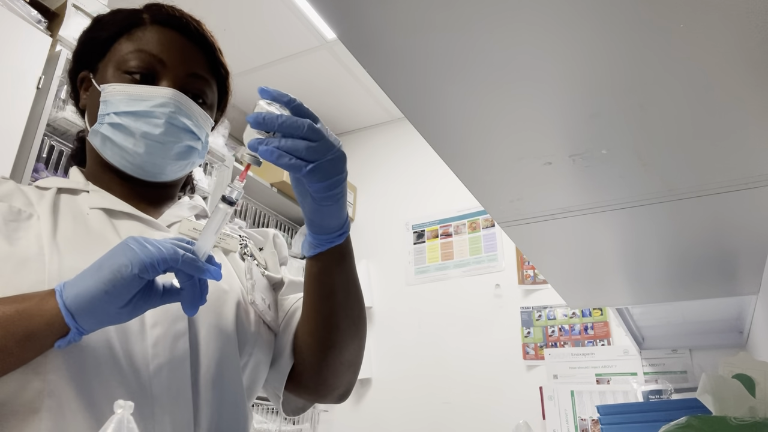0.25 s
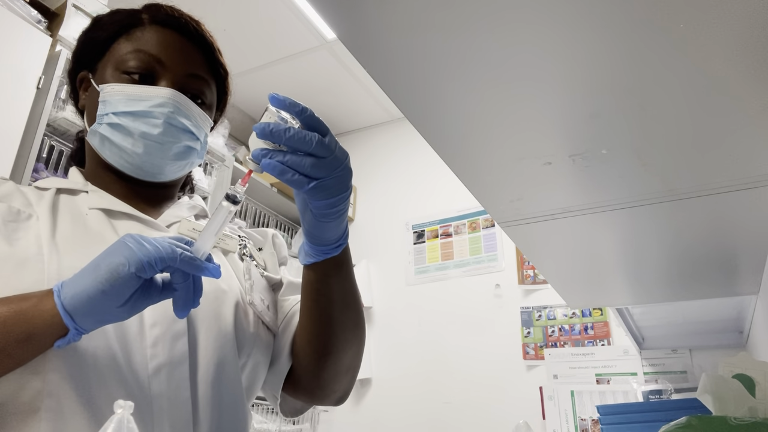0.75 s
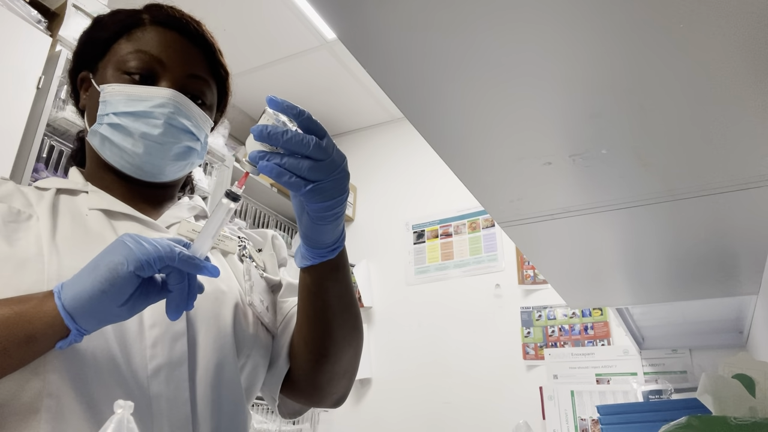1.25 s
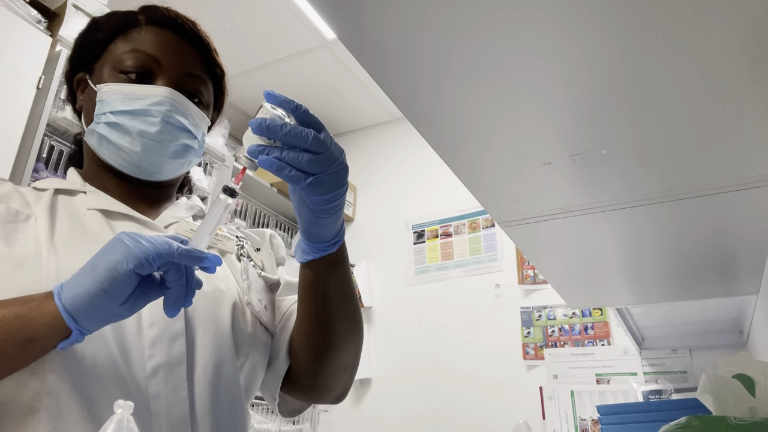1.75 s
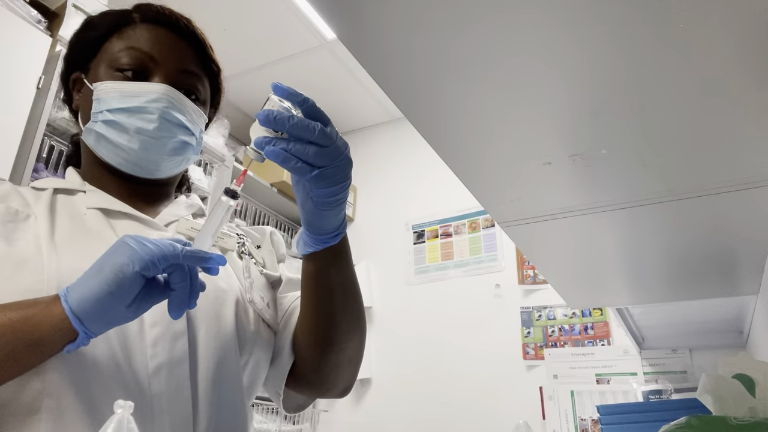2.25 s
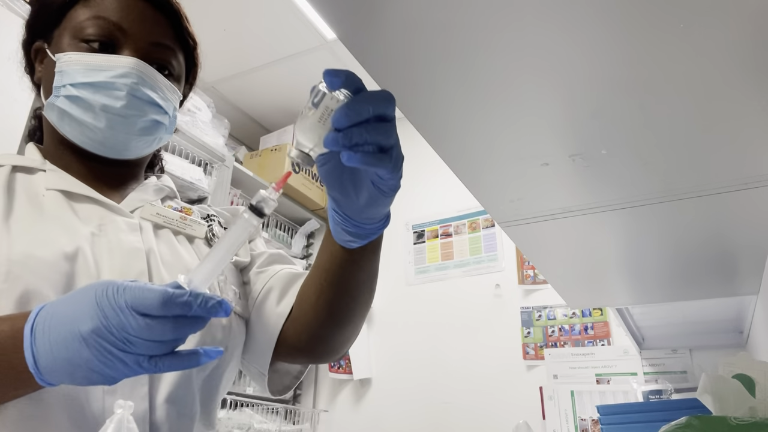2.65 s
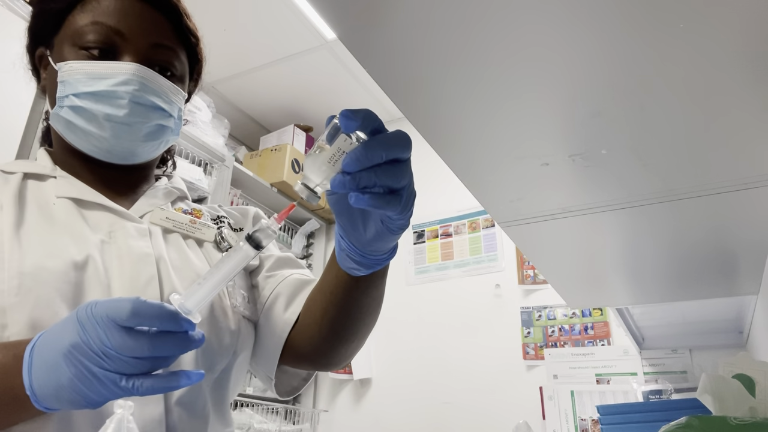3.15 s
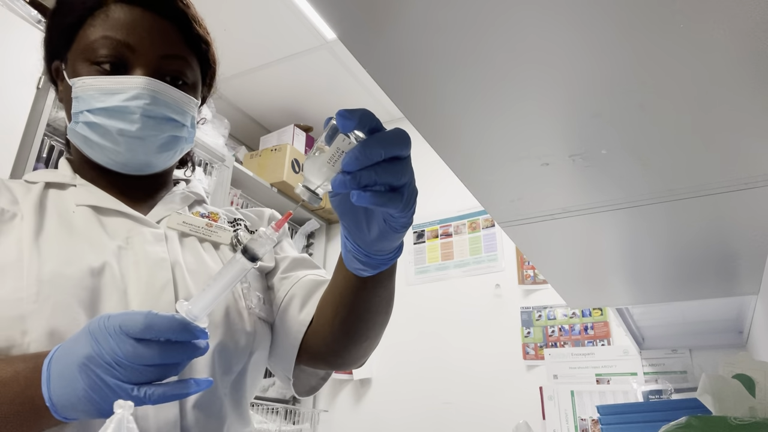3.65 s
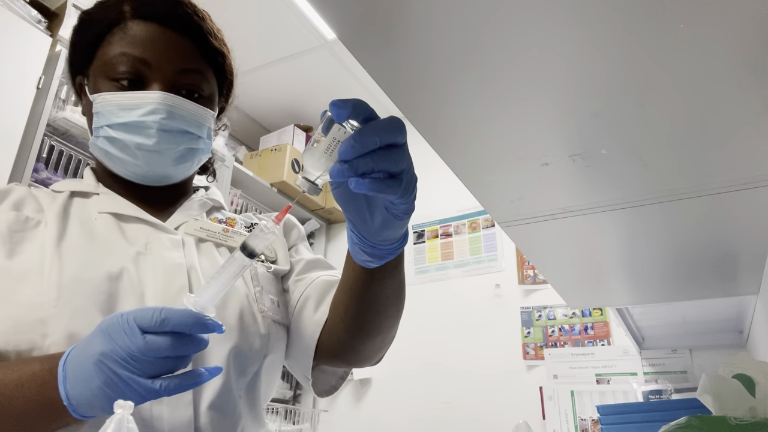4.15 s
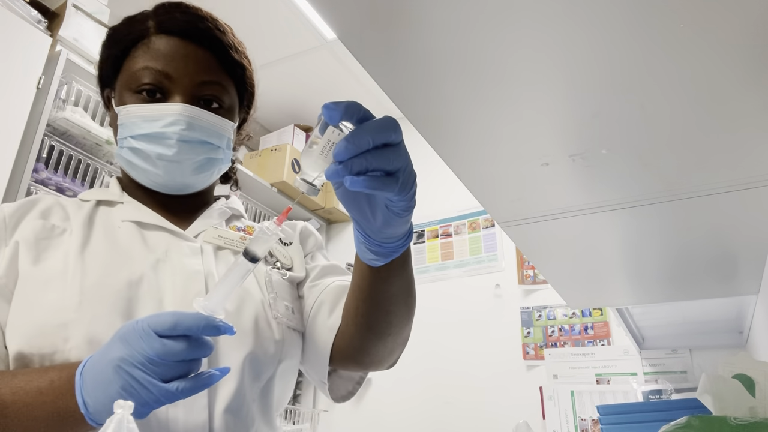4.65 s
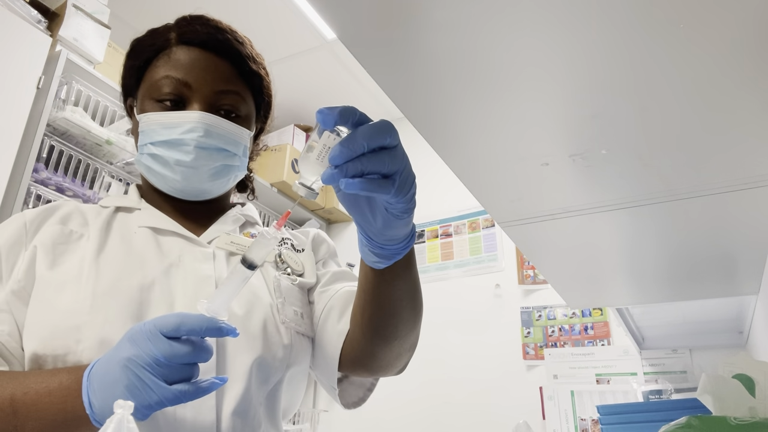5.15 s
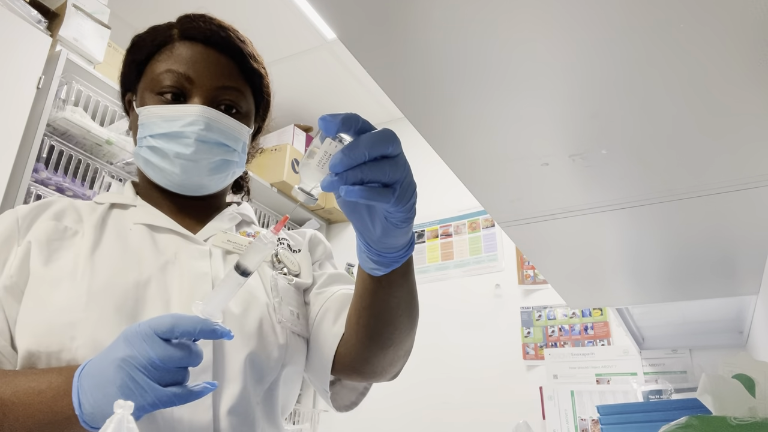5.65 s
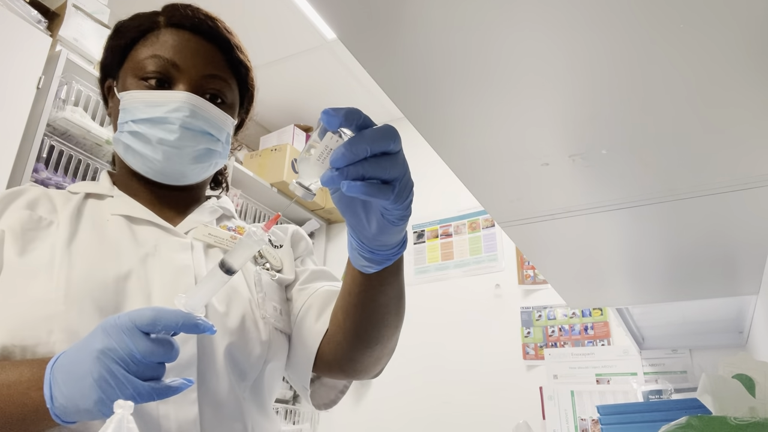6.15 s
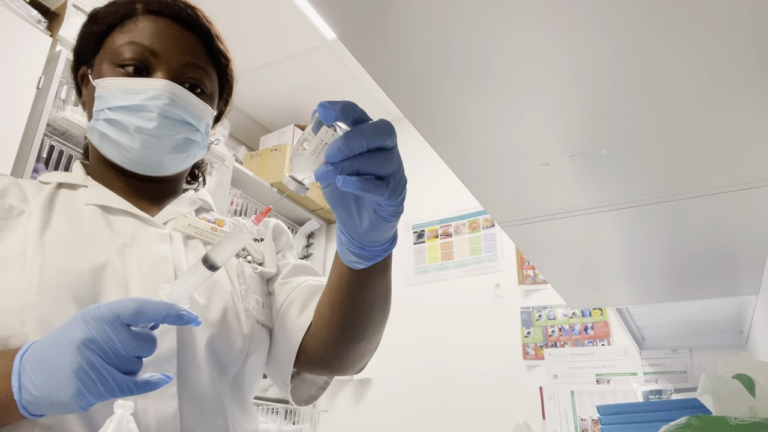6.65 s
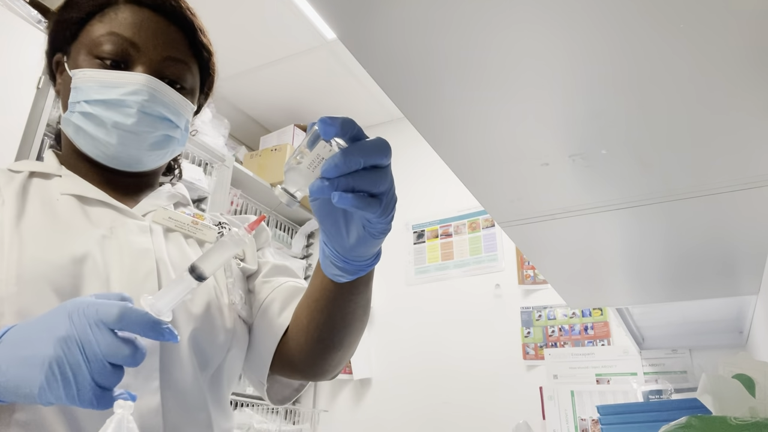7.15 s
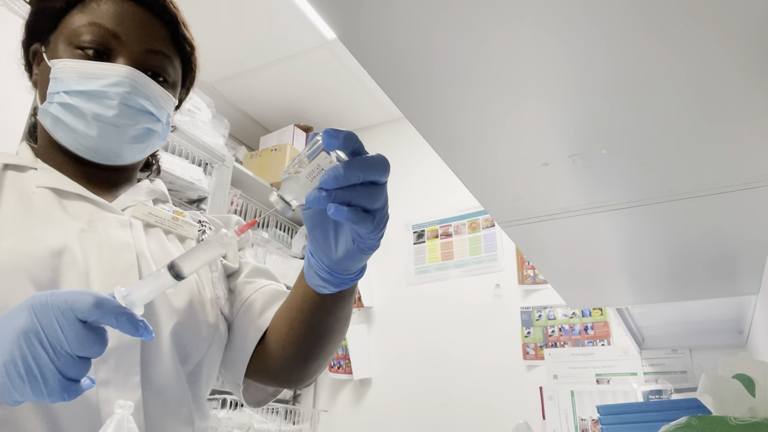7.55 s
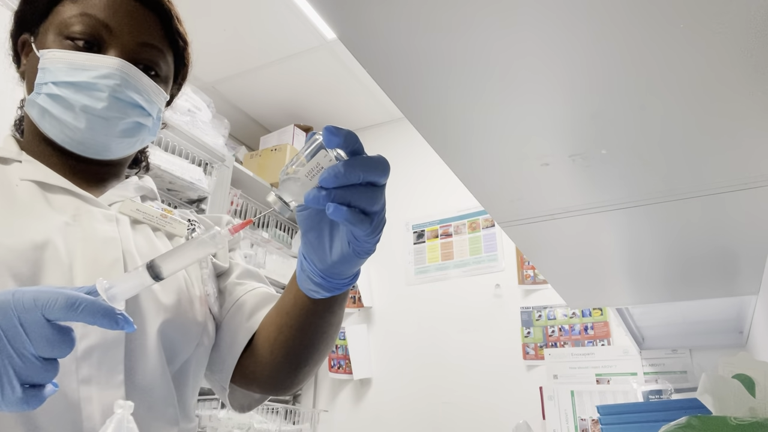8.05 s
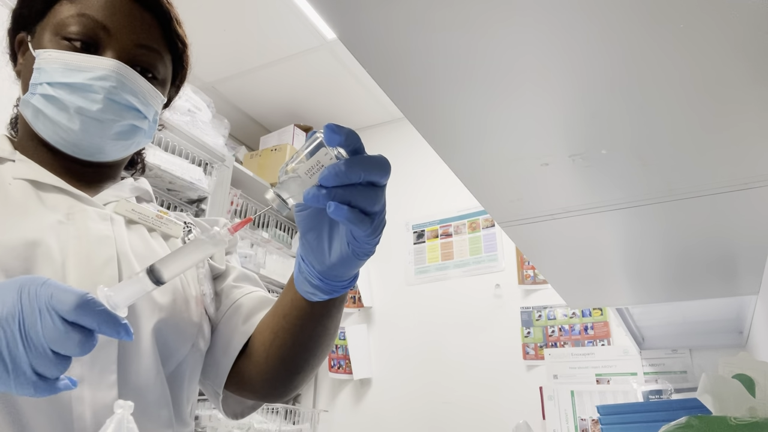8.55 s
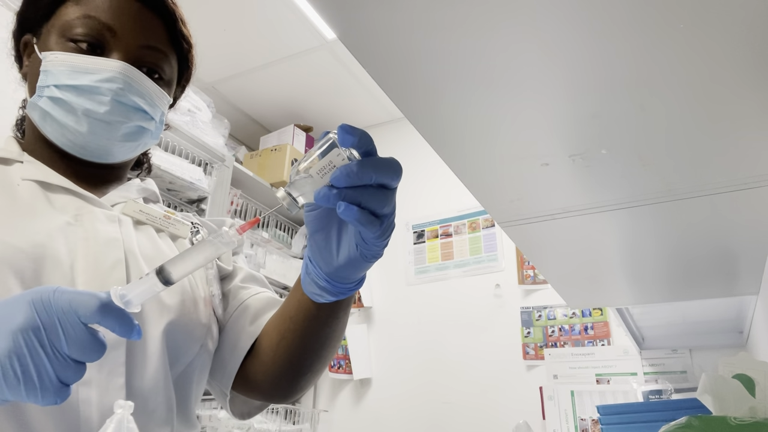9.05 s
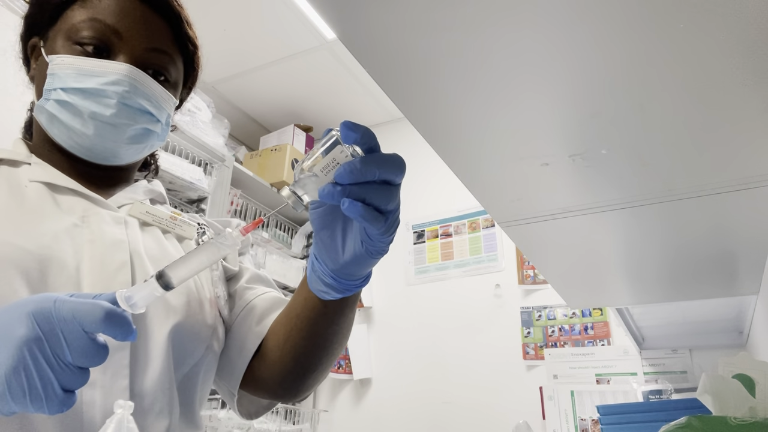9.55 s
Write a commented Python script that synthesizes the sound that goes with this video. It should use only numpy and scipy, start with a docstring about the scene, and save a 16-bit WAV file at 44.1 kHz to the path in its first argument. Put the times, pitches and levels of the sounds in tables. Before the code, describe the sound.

Throughout about ten seconds, an air-conditioning unit hums loudly in a small hospital room: a strong steady drone near 200 Hz with a weaker 100 Hz below it, low rushing air, faint fan tones and a thin, slightly wandering whistle near 1.4 kHz. Close to the stereo microphone, gloved hands work a syringe in a vial, far quieter than the hum. A faint scuff and tiny squeaks come at 1.2 s. At 2.4 s everything dips to silence for a few hundredths of a second. A dull plastic click follows at 2.9 s and a crisper, brighter one at 3.1 s. From 3.3 to 6.4 s there are sparse soft rubs, small knocks and high rubber squeaks. Rustling grows at 6.7 s and 7.7 to 8.5 s, then quiets. A small tick, scuff and cluster of squeaks come at 9.6 s. The room tail is short and dry.

```python
"""An air-conditioning unit hums in a small hospital room: a strong mains drone, faint fan-shaft tones,
steady whines, a thin air whistle and rushing air, made of sines, a modulated carrier and coloured noise.
Close by, gloved hands work a plastic syringe in a vial: two clicks (ringing modes and noise cracks),
small scuffs, knocks and a soft rustle (grainy noise), tiny squeaks (short rough tones), with a room tail."""
import sys
import numpy as np
from scipy import signal
from scipy.fft import rfft, irfft, next_fast_len
from scipy.io import wavfile
from scipy.ndimage import map_coordinates

SR = 44100
rng = np.random.default_rng(int(sys.argv[2]) if len(sys.argv) > 2 else 0)


def wrap_up_sound(samples):
    """Save the sound to the file named by the first command line argument, as 16-bit audio."""
    columns = np.atleast_2d(samples).T
    # keep every value between -1 and 1, then stretch to whole-number steps
    tamed = np.clip(columns, -1, 1)
    steps = np.round(tamed * 32767).astype(np.int16)
    wavfile.write(sys.argv[1], SR, steps)


N = 432621

# sound field at the two microphones: hz, coherence (0-1), left_lead_rad, left_minus_right_db
PORTS = [(45, .99, 0, -.8), (130, .99, .2, -4.4), (250, .93, .6, -3.8), (350, .55, 1, -5.6),
         (500, .38, 1.9, -3.2), (720, .55, 2.5, .4), (1000, .28, 2.1, 1.5), (1400, .4, 2.7, -.4),
         (2200, .14, 0, 3.5), (3200, .15, .3, 0), (5600, .1, -1, -1.8), (8000, .8, .5, -.3),
         (11050, .92, 3.1, 0), (13100, .7, 4.8, -.5), (15000, .9, 6.5, 0)]
HALF = np.array([[.5], [-.5]])  # splits a left-right difference evenly


def amp(db):
    """Decibels to gain."""
    return 10 ** (np.asarray(db) / 20)


def unit(x):
    """Scale to rms 1."""
    return x / np.sqrt(np.mean(x ** 2) + 1e-20)


def along(points, hz, axis=1):
    """One column of a table read on a log-frequency axis."""
    table = np.transpose(points)
    return np.interp(np.log(hz + 1), np.log(table[0] + 1), table[axis])


def left_lead_rad(hz):
    """Phase lead of the left microphone."""
    return along(PORTS, hz, axis=2)


def clock():
    """Time of each sample in seconds."""
    return np.arange(N) / SR


def curve(rows):
    """(s, value) rows joined by straight lines."""
    return np.interp(clock(), *np.transpose(rows))


def wobble(rate_hz):
    """A random curve with rate_hz knots a second."""
    coarse = np.arange(0, N + 64, 64)
    knots = rng.standard_normal(4096)
    values = map_coordinates(knots, [coarse * rate_hz / SR], mode="wrap")
    return np.interp(np.arange(N), coarse, values)


def complex_wobbles(rate_hz):
    """One complex random curve for each channel."""
    return np.array([wobble(rate_hz) + 1j * wobble(rate_hz) for _ in range(2)])


def filtered(x, response):
    """x times a response of frequency."""
    m = next_fast_len(N + SR // 2)
    return irfft(rfft(x, m) * response(np.fft.rfftfreq(m, 1 / SR)), m)[..., :N]


def at_ports(pair, colour_db):
    """Two unrelated noises become one coloured sound field of rms 1 at two microphones."""
    def mix(hz):
        turn = np.arccos(np.clip(along(PORTS, hz), 0, 1)) / 2  # sets the coherence
        return amp(colour_db(hz)) * [np.cos(turn), np.sin(turn)]

    def place(hz):
        balance = amp(HALF * along(PORTS, hz, axis=3))
        return balance * np.exp(1j * HALF * left_lead_rad(hz))

    mid, side = filtered(pair, mix)
    return unit(filtered(np.array([mid + side, mid - side]), place))


def tone(cycles, left_db, right_db, lead_rad):
    """A sine with its own level and phase at each microphone."""
    phase = 2 * np.pi * (cycles + rng.random())
    left = amp(left_db) * np.sin(phase + lead_rad)
    right = amp(right_db) * np.sin(phase)
    return np.sqrt(2) * np.array([left, right])


def motor(mains_hz=49.947, lead_rad=0.1, waver_db=0.14):
    """Magnetic forces shake the casing at even multiples of the mains."""
    # magnetic hum: mains_multiple, left_db, right_db
    harmonics = [(2, -37, -34.5), (4, -24.0, -18.5), (8, -68, -57), (12, -60.5, -58)]
    cycles = mains_hz * clock()
    hum = sum(tone(k * cycles, left, right, lead_rad * k) for k, left, right in harmonics)
    return hum * amp(waver_db * wobble(4.0))


def fan(shaft_hz=48.668, drift=.0001):
    """The shaft runs a little slower than the mains; its tones and the whines drift together in pitch."""
    # fan tones: shaft_multiple, left_db, right_db
    shaft_tones = [(14, -65, -65), (18, -66, -64.5), (20, -61.5, -67), (22, -71.5, -61), (24, -68, -70.5),
                   (26, -73, -73), (32, -73, -69.5), (57, -80, -78), (58, -73, -66), (59, -79, -75),
                   (60, -77, -72), (61, -66.5, -72), (62, -78, -84.5), (64, -79, -80.5), (65, -79, -79),
                   (66, -81, -83), (67, -77.5, -77), (75, -85, -80.5), (77, -81.5, -82.5), (119, -91, -86),
                   (158, -87.5, -89)]
    # other steady tones of the unit: pitch_hz, left_db, right_db
    whines = [(460, -55.0, -57.0), (11800, -82, -80), (12200, -88, -86)]
    seconds = np.cumsum(1 + drift * wobble(2)) / SR
    lines = [(k * shaft_hz, left, right) for k, left, right in shaft_tones] + list(whines)
    return sum(tone(hz * seconds, left, right, left_lead_rad(hz)) for hz, left, right in lines)


def whistle(pitch_hz=1364.7, wander_hz=1.3, lead_rad=-1.2, rough=0.23, breathy=.42):
    """A narrow air whistle that wanders in pitch, over a weaker skirt of turbulence."""
    # steady part of the whistle: time_s, level_db
    level_points = [(0, -55.5), (2.3, -55), (2.5, -61), (4, -58), (5.5, -56.5), (7.5, -59.5), (9.8, -64.5)]
    cycles = np.cumsum(pitch_hz + wander_hz * wobble(5)) / SR
    flutter = 1 + rough * complex_wobbles(16)
    skirt = breathy * complex_wobbles(90)
    carrier = np.exp(1j * (2 * np.pi * cycles + np.array([[lead_rad], [0]])))
    return amp(curve(level_points)) * np.sqrt(2) * ((flutter + skirt) * carrier).real


def airflow(air_db=-31.0, swell_db=0.93):
    """Turbulent air, coloured by the resonances of duct and room."""
    # spectrum of rushing air: hz, relative_density_db
    spectrum = [(27, -30.5), (44, -12.5), (65, -7), (85, -12.5), (130, -6), (240, -5.5), (340, -10.5),
                (430, -20), (620, -19.5), (900, -27), (1500, -29.5), (2100, -36.5), (3300, -40.5),
                (4500, -45.5), (6500, -51.5), (8700, -53), (10500, -62), (13000, -65.5), (15500, -68.5)]
    # resonances and hollows of duct and room: centre_hz, width_hz, gain_db
    resonances = [(46.6, 7.8, 5.5), (131.6, 14, 4), (149, 12, 2.5), (161.4, 12, -7.5), (182.5, 14, 7.5),
                  (329, 16, 1.5), (382, 36, -1.5), (430, 14, -1), (489.3, 33, 7.5), (530.5, 21, 6),
                  (590, 36, 0.5), (710, 18, -3), (759, 45, 6), (806, 33, -1.5), (926, 25, -4.5),
                  (956, 48, 5.5), (1065, 60, 5.5), (1210, 30, 6), (1320, 51, -4), (1460, 32, 4),
                  (2780, 50, 4), (3160, 120, -1.5)]

    def colour_db(hz):
        bumps = sum(db / (1 + (2 * (hz - centre) / width) ** 2) for centre, width, db in resonances)
        return along(spectrum, hz) + bumps

    return at_ports(rng.standard_normal((2, N)), colour_db) * amp(air_db + swell_db * wobble(6.5))


def syringe(crack_db=-5.0, crack_t60_s=0.014, ring_db=-6, scatter_db=2.2, right_db=1):
    """Each click is a contact and its rebound; both crack and ring barrel modes of alternating sign."""
    # clicks: contact_s, contact_db (before the lowpass), lowpass_hz, rebound_over_contact_db
    clicks = [(2.8823, -28.5, 1140, 4.5), (3.0907, -25.5, 12000, -5)]
    # ring of the plastic barrel: mode_hz, relative_db, t60_s
    modes = [(1070, -5, .015), (1620, 0.5, 0.017), (2040, -5, 0.01), (2600, -5.5, 0.01), (3180, -3.5, .008),
             (3550, -1, .012), (4900, -7, .008), (5950, -11, 0.011), (7160, -1.5, 0.011), (8380, -2, .011),
             (9300, 0.5, .009), (10700, -6, .007), (12100, -7, .007), (13900, -5, .009)]
    rebound_s = .00187  # from the first contact to the second
    shadow_hz = 4000  # above this the ring reaches the two microphones out of step
    out, t = np.zeros((2, N)), np.arange(SR // 10) / SR
    for s, db, dull_hz, rebound_db in clicks:
        pole = np.exp(-2 * np.pi * dull_hz / SR)
        for start_s, level_db in ((s, db), (s + rebound_s, db + rebound_db)):
            ring = 0
            for k, (hz, mode_db, t60_s) in enumerate(modes):
                decay = amp(mode_db + rng.normal(0, scatter_db, (2, 1)) - 60 * t / t60_s)
                offset_rad = HALF * left_lead_rad(hz) * (hz > shadow_hz)
                ring = ring + (-1) ** k * decay * np.sin(2 * np.pi * hz * t + offset_rad)
            crack = amp(crack_db - 60 * t / crack_t60_s) * rng.standard_normal((2, len(t)))
            hit = signal.lfilter([1 - pole], [1, -pole], amp(ring_db) * ring + crack)
            out[:, round(start_s * SR):][:, :len(t)] += amp(level_db - HALF * right_db) * hit
    return out


def gloves(pitch_q=3.3, grain_db=3.5, uneven_db=2.0):
    """Grainy low rustle; short scuffs and knocks, each with a pitched part, from faint to dominant."""
    # scuffs and small knocks of glove, barrel and vial:
    # start_s, noise_db, length_s (twice the rise), pitch_hz, pitched_db
    contacts = [(1.233, -63, 0.0074, 8300, -65), (2.587, -62, .015, 5550, -62),
                (2.879, -55, 0.0064, 2000, -49), (3.585, -57, 0.014, 5600, -65),
                (4.590, -58, .006, 13700, -67), (4.759, -55, 0.024, 5940, -54),
                (4.945, -68, .012, 13500, -69), (5.169, -63, 0.012, 2550, -50.5),
                (5.588, -61, .018, 1900, -55), (5.821, -68, .02, 5200, -63), (6.185, -75, .04, 3500, -60),
                (6.59, -65, .016, 13700, -72), (6.912, -61, 0.026, 8000, -67),
                (7.143, -61, .014, 4800, -63), (7.585, -65, 0.023, 2500, -56),
                (9.596, -61, 0.011, 2720, -51.5)]
    # colour of rubbing rubber: hz, relative_density_db
    spectrum = [(500, -19), (2000, 1.5), (5500, 2), (8200, 3), (10800, -3), (13500, 0), (16000, -6)]
    grains = rng.standard_normal((2, N)) * amp(grain_db * wobble(900))
    friction = at_ports(grains, lambda hz: along(spectrum, hz))
    out = friction * rubbing() * amp(uneven_db * wobble(45))
    for s, noise_db, length_s, hz, pitched_db in contacts:
        span = slice(int(s * SR), int(s * SR) + SR // 8)
        noise = friction[:, span]
        age = np.arange(noise.shape[1]) / SR / (length_s / 2)
        pitched = unit(signal.lfilter(*signal.iirpeak(hz, pitch_q, SR), noise))
        out[:, span] += age * np.exp(1 - age) * (amp(noise_db) * noise + amp(pitched_db) * pitched)
    return out


def rubbing(attack_s=.03, release_s=0.055, resting_db=-77):
    """Rustle strength: each stroke rises, holds and dies away (to 1/e in release_s) over resting hands."""
    # glove and sleeve strokes as the grip shifts and the plunger is drawn: mid_rise_s, hold_s, level_db
    strokes = [(1.268, .05, -69), (2.802, 0.08, -65), (3.266, .17, -69), (3.948, .28, -68),
               (4.87, 0.48, -68), (5.538, .3, -68.5), (6.36, 0.3, -69), (6.675, 0.071, -61.5),
               (6.95, .14, -70.5), (7.678, 0.35, -61.5), (8.2, 0.33, -64), (9.603, .2, -66)]
    power = np.full(N, amp(resting_db) ** 2)
    for s, hold_s, db in strokes:
        age_s = clock() - s
        rise = np.clip(age_s / attack_s + .5, 0, 1)
        fall = np.exp(-np.maximum(age_s - hold_s, 0) / release_s)
        power += (amp(db) * rise * fall) ** 2
    return np.sqrt(power)


def crackles(rough_rad=2.7):
    """Rubber lets go and chatters for a moment: one pitched grain, the shorter the rougher."""
    # single catches that stand out: start_s, level_db, pitch_hz, length_s (twice the rise)
    squeaks = [(1.288, -61, 8200, .006), (1.311, -62, 8000, .005), (2.575, -57, 5550, .005),
               (2.591, -60, 5520, 0.0043), (3.588, -58, 5550, .008), (3.958, -60, 8900, .005),
               (4.019, -57, 9900, .004), (5.048, -61, 9000, .005), (5.536, -64, 13700, .002),
               (5.645, -57, 8200, 0.0026), (5.697, -60, 9200, .003), (5.802, -58, 7830, .003),
               (5.978, -63, 7700, .003), (6.259, -64, 13640, 0.0028), (6.355, -59, 7700, .003),
               (6.382, -59, 7400, .003), (6.437, -55, 8360, .003), (6.57, -56, 8030, 0.0037),
               (6.636, -60, 8020, .003), (7.625, -54, 11400, .002), (7.673, -58, 8160, 0.0036),
               (7.981, -56, 8240, .003), (8.076, -57, 9650, .004), (8.575, -60, 5550, .005),
               (8.594, -64, 13500, .004), (9.566, -48, 1900, .0015), (9.584, -55, 5400, .003),
               (9.603, -58, 8200, .003), (9.646, -60, 8400, .003), (9.662, -59, 7600, 0.0037),
               (9.676, -57, 9100, .003)]
    out, t = np.zeros((2, N + SR)), np.arange(SR // 20) / SR
    for s, db, hz, length_s in list(squeaks) + catches(rubbing()):
        walk = np.cumsum(rng.standard_normal(len(t))) / np.sqrt(length_s * SR)
        cycles = hz * t + rough_rad / (2 * np.pi) * walk
        age = t / (length_s / 2)
        grain = age * np.exp(1 - age) * tone(cycles, db, db, left_lead_rad(hz))
        out[:, round(s * SR):][:, :len(t)] += grain
    return out[:, :N]


def catches(strength, peak_rate_hz=70, length_s=0.0016):
    """Random tiny squeaks, more frequent where the gloves rub harder: start_s, level_db, pitch_hz, length_s."""
    centre_db, spread_db = -65, 3.5
    centre_hz, spread_oct = 8000, 0.27
    draws = rng.random((round(peak_rate_hz * N / SR), 4))
    chance = (strength - strength.min()) / np.ptp(strength)
    rows = []
    for when, luck, size, pitch in draws:
        if luck < chance[int(when * N)]:
            level_db = centre_db + spread_db * (2 * size - 1)
            pitch_hz = centre_hz * 2 ** (spread_oct * (2 * pitch - 1))
            rows.append((when * N / SR, level_db, pitch_hz, length_s))
    return rows


def room(x, t60_s=0.079, buildup_s=0.0036):
    """The short diffuse answer of the small room: decaying noise convolved with the sound."""
    t = np.arange(SR // 2) / SR
    tail = rng.standard_normal((2, len(t))) * amp(-60 * t / t60_s) * (1 - np.exp(-t / buildup_s))
    return signal.fftconvolve(x, tail / np.linalg.norm(tail[0]), axes=1)[:, :N]


def scene(room_db=-14):
    """The running unit and the hands in front of it."""
    hands = syringe() + gloves() + crackles()
    return motor() + fan() + whistle() + airflow() + hands + amp(room_db) * room(hands)


def record(dry):
    """The level dips briefly to nothing once; the top of the band is cut."""
    dip_s, fade_s = 2.39, .029
    top_hz, edge_hz = 15800, 500
    dip = np.minimum(abs(clock() - dip_s) / fade_s, 1)
    return filtered(dry * dip, lambda hz: np.clip((top_hz - hz) / edge_hz + .5, 0, 1))


dry = scene()
out = record(dry)
wrap_up_sound(out)
```